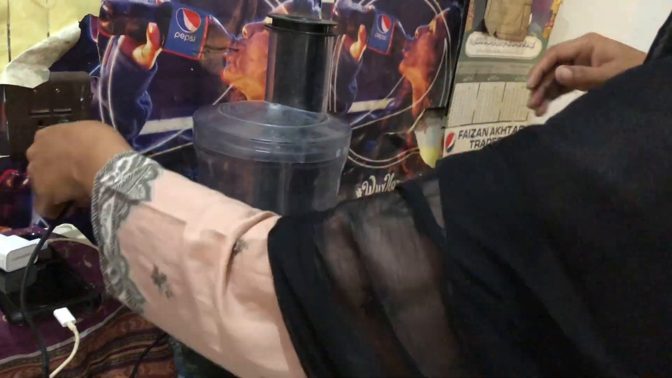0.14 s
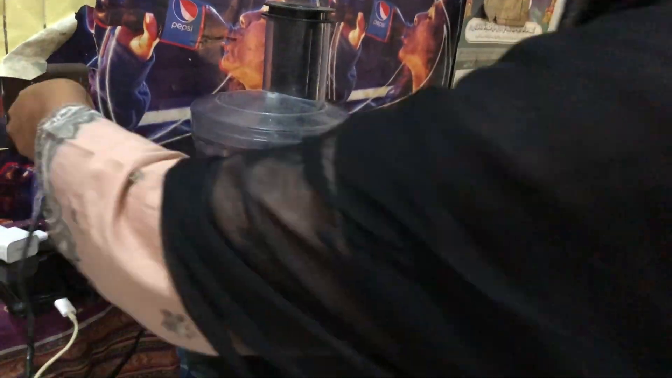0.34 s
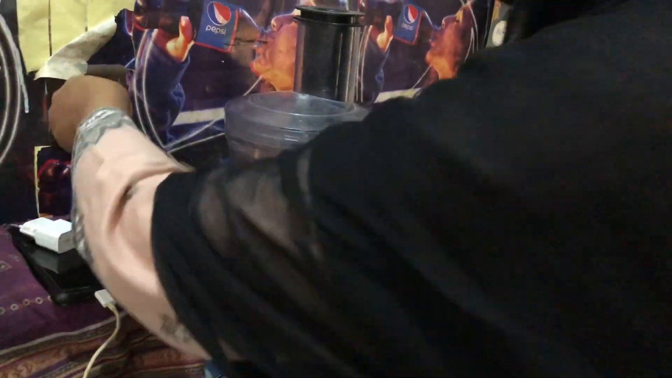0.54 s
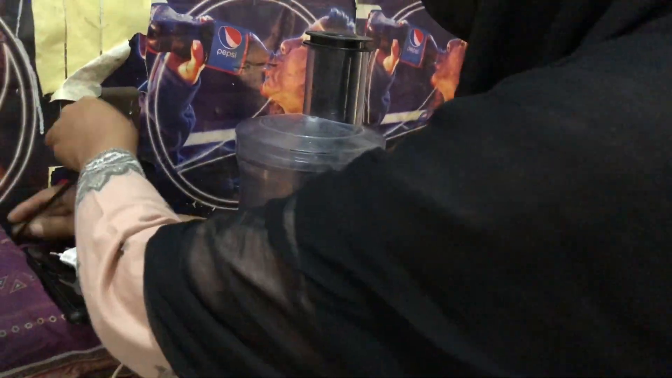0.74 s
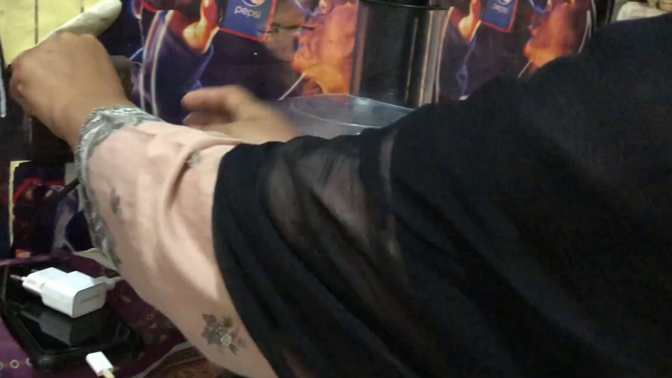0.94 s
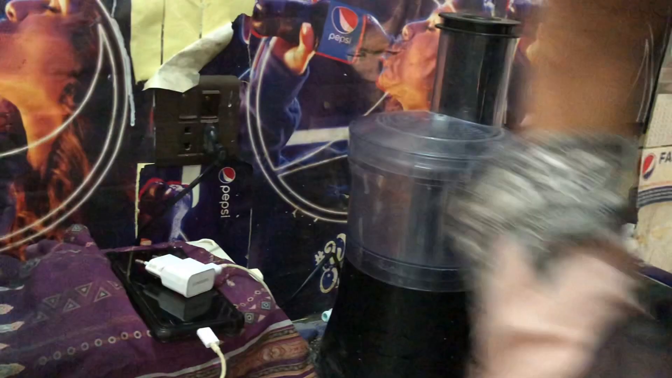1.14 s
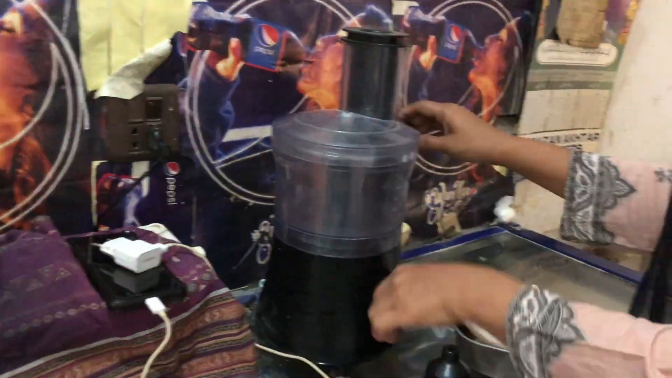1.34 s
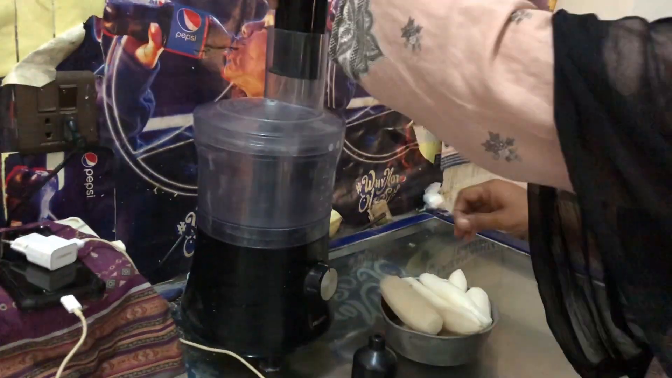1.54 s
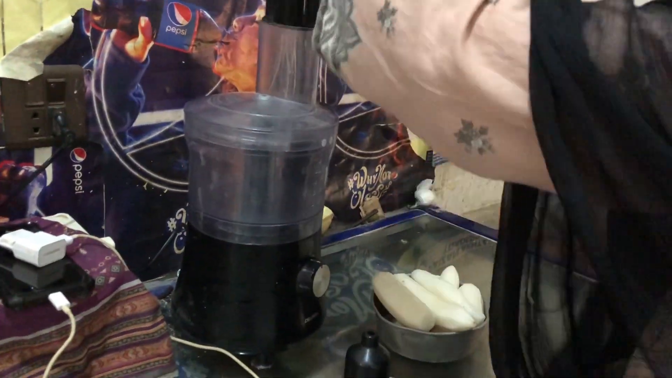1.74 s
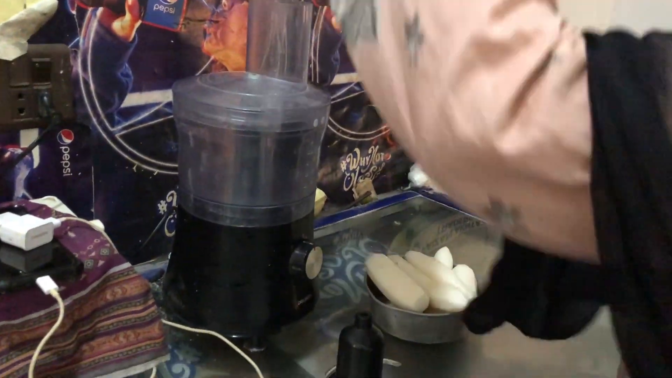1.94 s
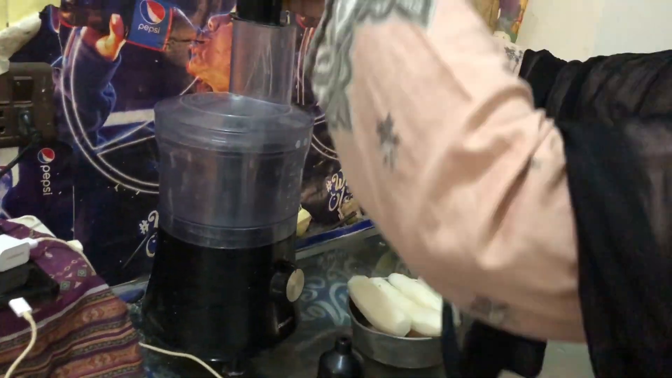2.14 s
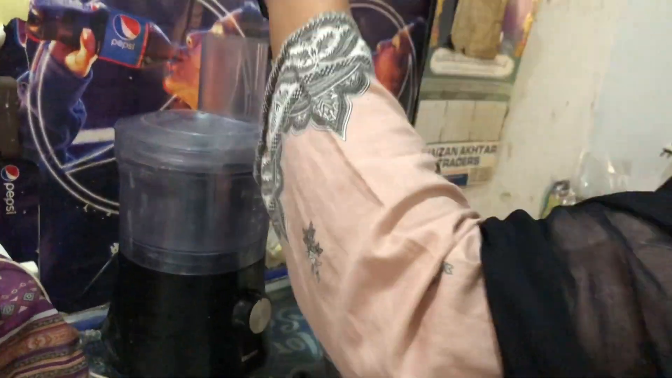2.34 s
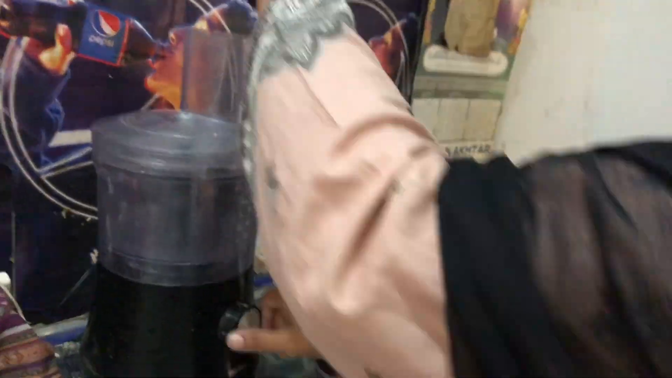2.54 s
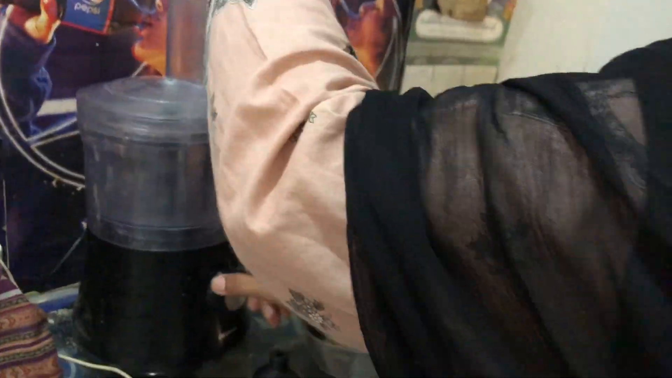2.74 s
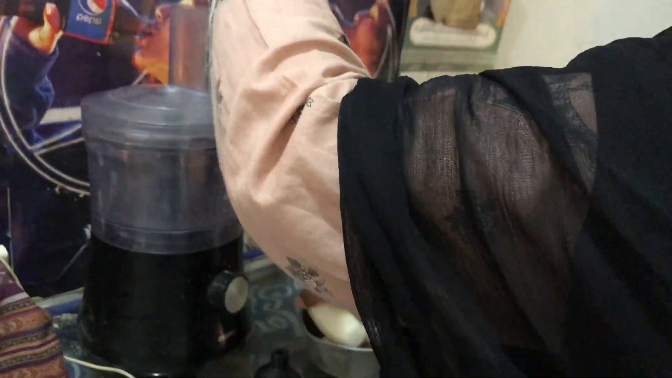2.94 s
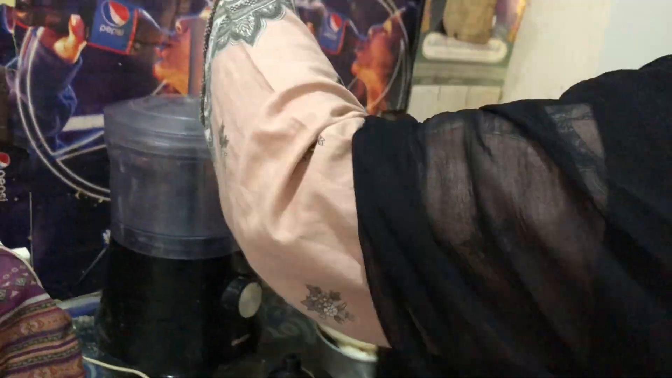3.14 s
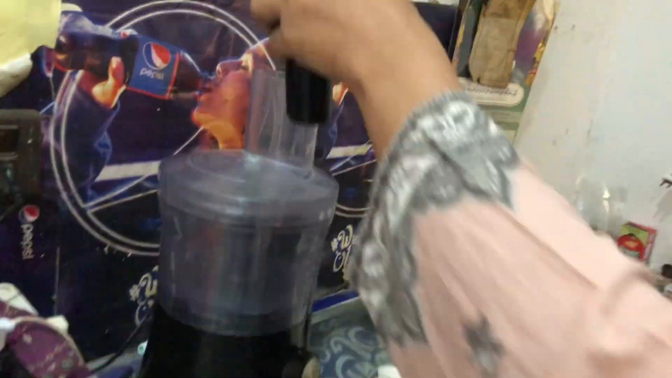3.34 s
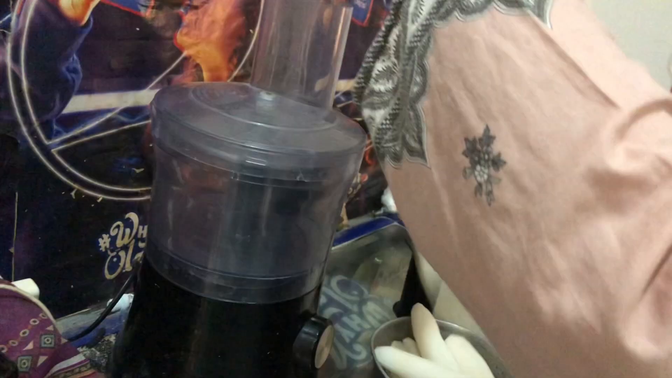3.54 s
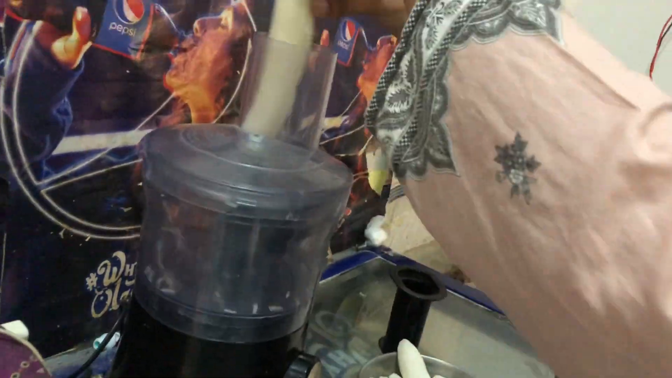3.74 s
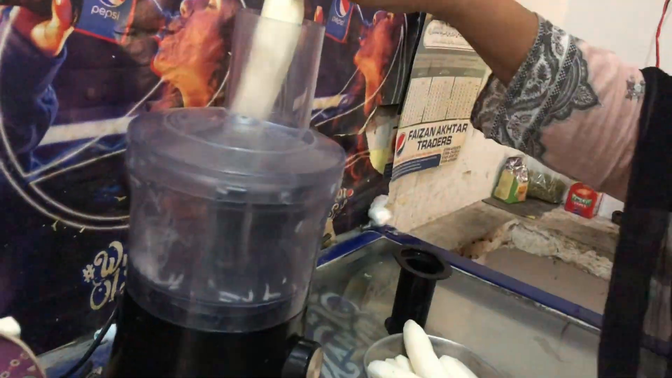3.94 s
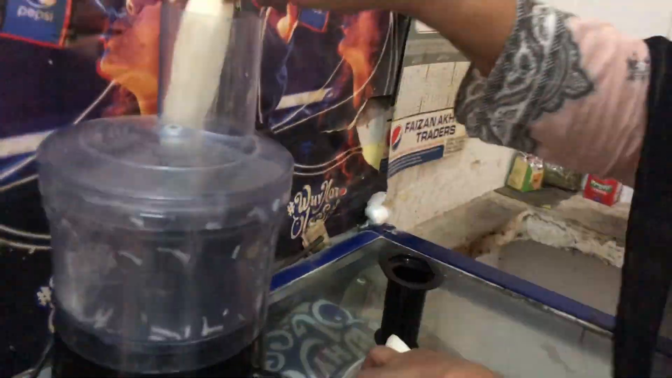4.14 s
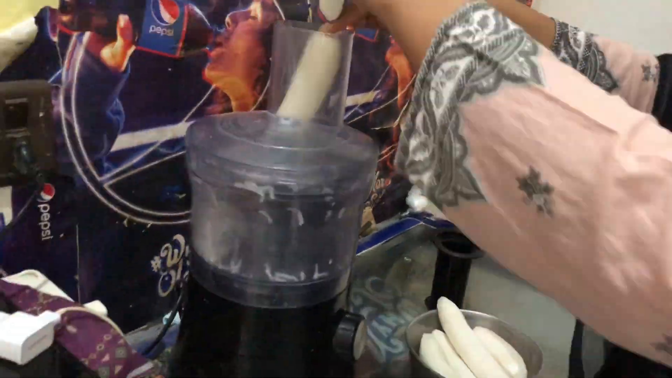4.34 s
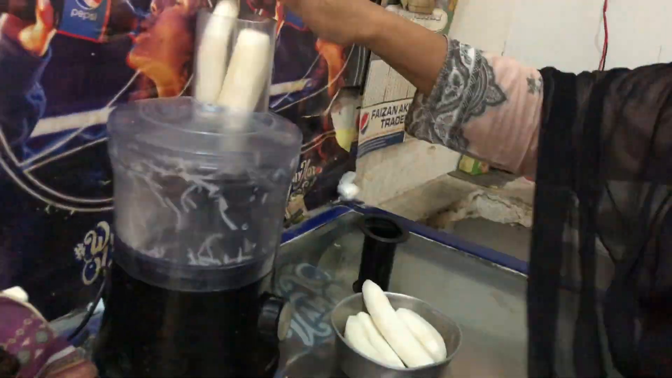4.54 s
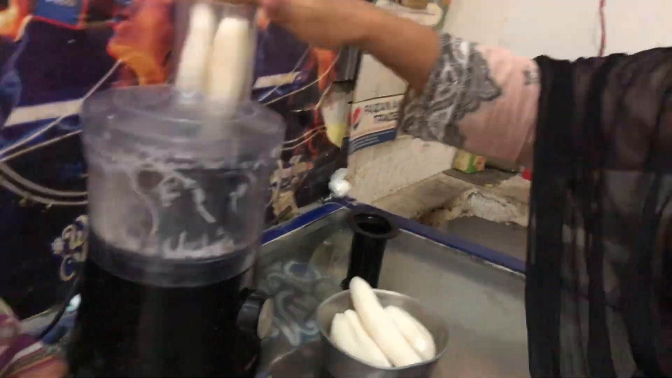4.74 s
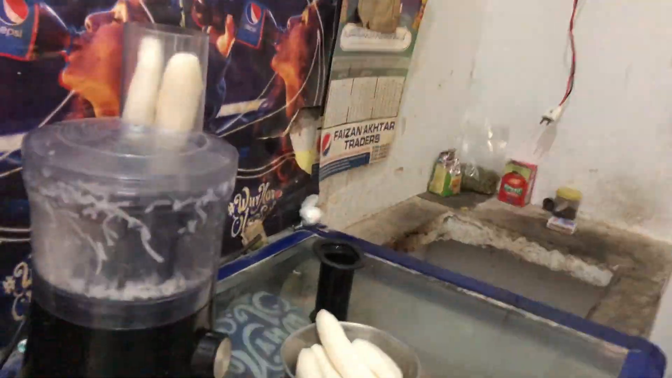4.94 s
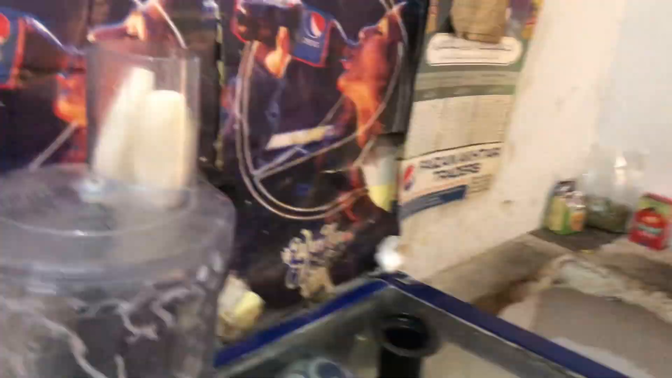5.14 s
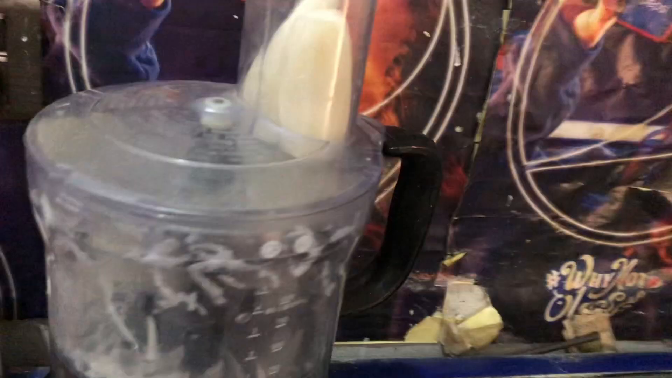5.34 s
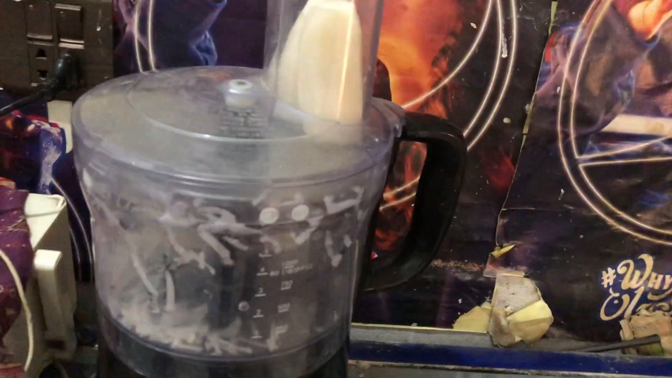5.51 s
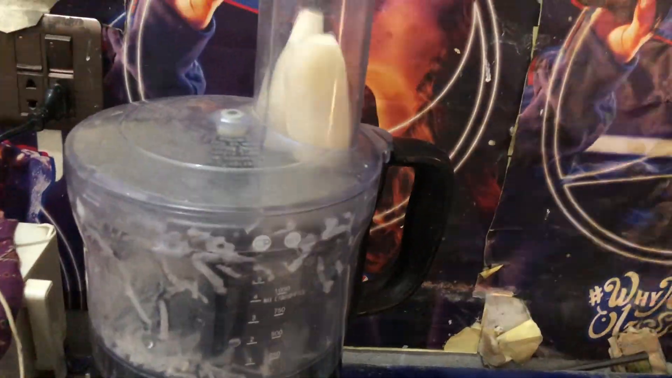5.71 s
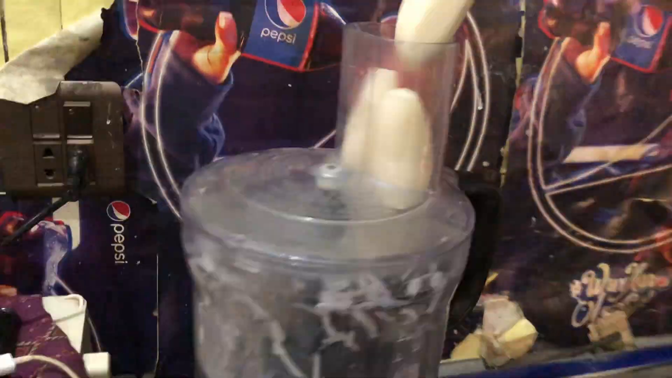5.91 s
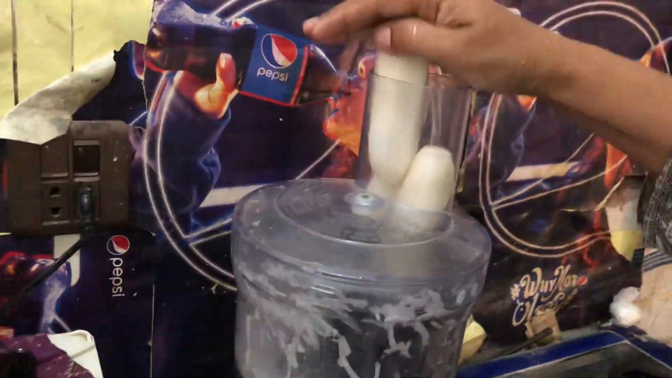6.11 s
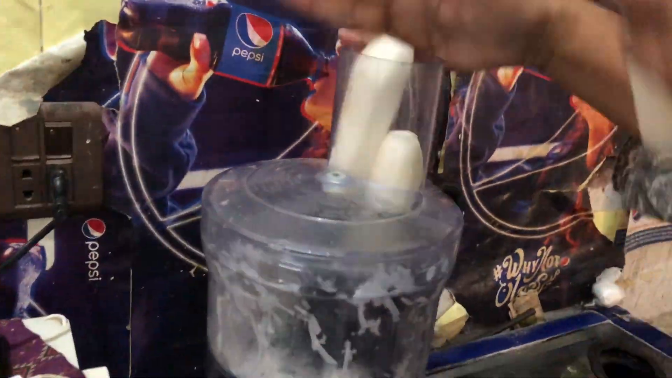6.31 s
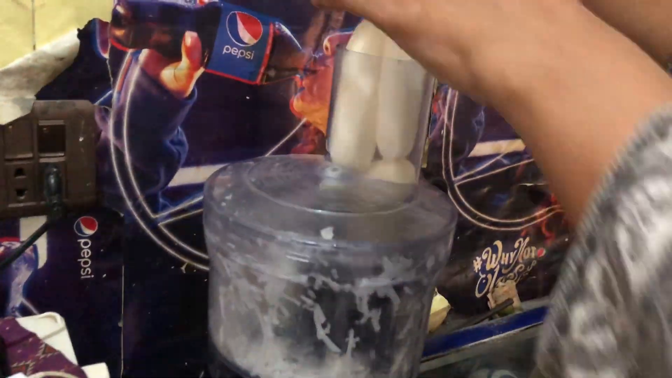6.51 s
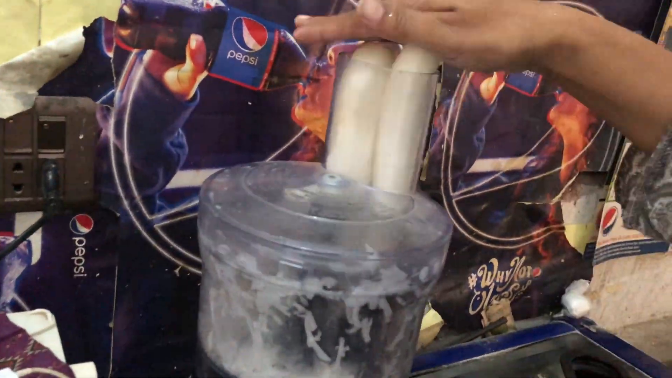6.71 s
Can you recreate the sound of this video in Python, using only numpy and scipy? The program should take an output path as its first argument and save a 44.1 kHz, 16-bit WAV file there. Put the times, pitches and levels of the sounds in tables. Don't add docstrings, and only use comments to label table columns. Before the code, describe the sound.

Over faint room hiss and fan hum, plastic slides softly from 0 s, with small ticks of a plug around 0.2-0.5 and sharper switch snaps at 0.54 and 0.8. At 1.1 the motor bursts into a rising whirr, cutting off and winding down by about 1.45. From 1.5 to 2.3 hard plastic lid and pusher are fitted: clicks, table thuds, a loud double clack near 1.78, catches and rattles. A bright latch crack lands at 2.43, then near quiet. At 2.9 the motor whines up quickly into a loud, hissy, brushy roar that lasts to the end. Roots drop with hollow thumps at 3.13 and 3.42, squeaking; a sharp bite and squeal come at 4.0. Irregular chunky knocks follow, dense until 4.5, sparser later, with renewed bites around 6.0-6.7. The bowl throbs and the whine wavers under load. Close, dry, bass-light sound.

```python
import sys
import numpy as np
from scipy import signal
from scipy.fft import rfft, irfft, next_fast_len
from scipy.io import wavfile

SR = 44100
rng = np.random.default_rng(int(sys.argv[2]) if len(sys.argv) > 2 else 0)


def rack_gain(trim_db):
    fader = np.asarray(trim_db, float)
    return 10 ** (fader / 20)


def transcribe(u):
    v = np.clip(np.atleast_2d(u).T, -1, 1)
    q = np.round(v * 32767).astype(np.int16)
    wavfile.write(sys.argv[1], SR, q)


N = 298557


def rms_one(x):
    return x / np.sqrt(np.mean(x ** 2) + 1e-20)


def in_time(tables, quiet=-120.):
    t = np.arange(N) / SR
    out = np.full((len(tables[0][0]) - 1, N), quiet)
    for rows in tables:
        s, *columns = np.transpose(rows)
        inside = (t >= s[0]) & (t <= s[-1])
        out[:, inside] = [np.interp(t[inside], s, c) for c in columns]
    return out


def drift(rate_hz):
    points = rng.standard_normal(1000)
    return np.interp(np.arange(N) / SR * rate_hz, np.arange(1000), points) * 0.8


def swell(start_s, rise_s, hold_s, level_db, fade_db_per_s):
    out, at = np.zeros(N + SR), round(start_s * SR)
    t = np.arange(SR) / SR
    fade_db = fade_db_per_s * np.maximum(t - rise_s - hold_s, 0)
    out[at:at + SR] = np.clip(t / max(rise_s, .001), 0, 1) * rack_gain(level_db - fade_db)
    return out[:N]


def band(x, low_hz, high_hz):
    return signal.sosfilt(signal.butter(3, [low_hz, high_hz], "band", fs=SR, output="sos"), x)


def resonate(x, hz, width):
    r = np.exp(-np.pi * width / SR)
    zeros = np.array([1, 0, -1]) * (1 - r * r) / 2
    return signal.lfilter(zeros, [1, -2 * r * np.cos(2 * np.pi * hz / SR), r * r], x)


def narrow(x, hz, width):
    return rms_one(resonate(resonate(x, hz, 3 * width), hz, width))


def colour(x, spectrum):
    hz, db = np.transpose(spectrum)
    size = next_fast_len(N)
    grid = np.maximum(np.arange(size // 2 + 1) * SR / size, 1)
    return irfft(rfft(x, size) * rack_gain(np.interp(np.log(grid), np.log(hz), db)), size)[:N]


def room(x):
    t60_s, level_db = 0.13, -8.5
    t = np.arange(int(.4 * SR)) / SR
    tail = band(rng.standard_normal(len(t)), 230, 12800) * rack_gain(-60 * t / t60_s) * (t > .004)
    return rack_gain(level_db) * signal.fftconvolve(x, tail / np.linalg.norm(tail))[:N]


# frequency in Hz, level in dB.
ROOM_HISS = [(47, -63), (80, -47), (417, -5), (582, -17), (795, -3), (889, -11), (994, -6.5), (1810, -8),
             (2270, -13.5), (2900, -6), (3620, -10.5), (12100, -22.5), (15700, -20)]
# frequency in Hz, width in Hz, level in dB.
FAN_HUMS = [(153, 330, -65.5), (505.5, 17, -58.5), (1770, 24, -55), (1520, 530, -50), (5316, 6.9, -68),
            (6960, 10, -70), (9030, 10, -72)]


def background():
    air = rng.standard_normal((2, N))
    hiss = rack_gain(-50 + 2.0 * drift(7.87)) * rms_one(colour(air[0], ROOM_HISS))
    hums = sum(rack_gain(db + 1.3 * drift(9)) * narrow(air[1], hz, width) for hz, width, db in FAN_HUMS)
    return hiss + hums


# frequency in Hz, width in Hz, level in dB.
TABLE_MODES = [(205, 5.8, -7), (266, 18, -9), (327, 20, -10), (393, 18, -2), (454, 22, -2), (507, 20, 4),
               (653, 39, -3.5), (827, 11, -6)]
# start in seconds, hold in seconds, level in dB, lowest mode in dB.
THUDS = [
    (1.016, 0.011, -34, -1),
    (1.114, 0.19, -47, -33),
    (1.488, .01, -38, -13),
    (1.602, 0.054, -24, -0.5),
    (1.85, 0.041, -24.5, 4),
    (2.614, 0.019, -40, 12),
    (3.128, 0.019, -26, -20),
    (3.4, 0.026, -24, -8),
    (3.56, 0.28, -41, 11),
    (3.694, .02, -28.5, -24),
]


def table():
    rise_s, fade_db_per_s = 0.019, 146
    shove = rng.standard_normal(N)
    lowest, *others = [rack_gain(db) * narrow(shove, hz, width) for hz, width, db in TABLE_MODES]
    rings, out = sum(others), np.zeros(N)
    for s, hold, level_db, low_db in THUDS:
        out += swell(s, rise_s, hold, level_db, fade_db_per_s) * rings
        out += swell(s, rise_s, hold, level_db + low_db, 0.66 * fade_db_per_s) * lowest
    return rack_gain(-15.0) * out


# frequency in Hz, level in dB, t60 in seconds.
BODY_MODES = [(694, -7, .1), (820, -2, .055), (930, -3, .045), (1010, -1, .045), (1120, -1, .055),
              (1314, -3, .04), (1460, -5, .045), (1970, -4, .03), (2290, -4, .025), (2800, -7, .018)]
# frequency in Hz, level in dB, t60 in seconds.
SNAP_MODES = [(3730, -10, .03), (4550, 0, .025), (4850, 1, .025), (5280, 1, .03), (5650, 0, .02),
              (6150, -3, .02)]
# start in seconds, swell in seconds, hold in seconds, level in dB.
SLIDES = [
    (0.0, 0.79, .1, -36),
    (.44, .06, 0.09, -37),
    (0.674, 0.004, 0.02, -33),
    (0.7, .09, 0.03, -31),
    (1.48, .1, .01, -43),
    (1.75, .1, .2, -42),
    (2.33, 0.077, .01, -34),
]


def slides():
    grains = rng.standard_normal(N) * rack_gain(4.5 * drift(150))
    ringing = sum(rack_gain(level_db) * resonate(grains, hz, 150) for hz, level_db, _ in SNAP_MODES)
    rubbing = rms_one(band(grains, 1500, 15600) + 0.8 * ringing)
    strokes = sum(swell(*row, 101) for row in SLIDES)
    return rack_gain(-18.5) * strokes * rubbing


# start in seconds, length in seconds, start Hz, end Hz, level in dB.
RUBS = [
    (.1, .056, 800, 795, -51),
    (.218, .1, 1520, 1330, -38.5),
    (.96, .035, 3600, 3540, -49),
    (1.93, .19, 4200, 3970, -47),
    (2.07, .07, 3680, 3600, -50),
]
# start in seconds, length
# in seconds, start Hz, end Hz, level in dB.
SQUEAKS = [(3.28, .05, 1980, 2420, -21), (3.325, .09, 2400, 2350, -26.5), (3.31, .11, 1170, 1140, -25),
           (4.0, .055, 2480, 2590, -16), (4.095, .027, 2050, 2040, -26), (4.0, .07, 1150, 1300, -26),
           (4.07, .06, 1290, 1100, -28), (3.19, .06, 2960, 3000, -31), (3.265, .05, 2950, 3170, -29),
           (3.47, .05, 2280, 2450, -28), (3.48, .05, 3600, 3900, -32), (4.826, .018, 3250, 3300, -29),
           (6.206, .05, 4260, 4306, -33), (5.24, .16, 4200, 4280, -36)]


def squeaks():
    out = np.zeros(N)
    for rows, breadth in [(RUBS, .16), (SQUEAKS, 0.026)]:
        for s, length, start_hz, end_hz, level_db in rows:
            at, size = round(s * SR), round(length * SR)
            steps = np.arange(size) / SR * breadth * start_hz
            slow = [np.interp(steps, np.arange(200), row) for row in rng.standard_normal((2, 200))]
            glide_hz = start_hz + (end_hz - start_hz) * np.sin(np.linspace(0, np.pi / 2, size))
            phase = 2 * np.pi * np.cumsum(glide_hz) / SR
            tone = rms_one(slow[0] * np.cos(phase) + slow[1] * np.sin(phase))
            out[at:at + size] += rack_gain(level_db) * tone * signal.windows.tukey(size, .5)
    return out


# frequency in Hz, level in dB, t60 in seconds.
LATCH_MODES = [(694, -9, 0.33), (790, -9, 0.11), (1040, -3, 0.022), (1116, -9, 0.073), (1490, -10, 0.08),
               (1780, -10, 0.073), (1980, -2, 0.061), (2880, 8, 0.019), (3009, -12, 0.18), (3110, 4, .07),
               (3770, -4, 0.043), (4390, 7, 0.048), (5100, 4, 0.029), (5870, -21.5, .08)]


def latch():
    start_s, rebound_s, rebound_db, level_db = 2.4338, 0.0024, -1, -4.5
    burst, at = np.zeros(N) + 1e-18, round(start_s * SR)
    burst[at:at + 200] = 0.041 * rng.standard_normal(200) * np.exp(-np.arange(200) / 60.)
    burst[[at, at + round(rebound_s * SR)]] += [1, rack_gain(rebound_db)]
    rings = np.zeros(N)
    for k, (hz, mode_db, t60) in enumerate(LATCH_MODES):
        rings += (-1) ** k * rack_gain(mode_db) * resonate(burst, hz, 2.8 / t60) * t60
    return rack_gain(level_db) * rings / np.max(np.abs(rings))


# start in seconds, hollow body in dB, tick over body in dB, t60 in seconds.
PLUG = [(0.0014, -39.5, 7.5, 0.15), (0.2214, -35, -9, 0.1), (0.2557, -42, -6, 0.088),
        (0.295, -46, -20, 0.14), (0.492, -26, -9, 0.19), (0.505, -29, -5, 0.079), (0.5153, -36, 6, .1),
        (0.5624, -39, 4, 0.11), (0.608, -41, 6, .1), (0.6754, -29, 14, 0.056), (0.7256, -35, 7, 0.098),
        (0.738, -39, 8, .1), (0.7574, -36.5, 18, 0.1), (0.7925, -31, 11, 0.12), (0.799, -22, 3, 0.15),
        (1.0395, -40, 7, .09), (1.1081, -35, 22, 0.081)]
ROCKER = [
    (0.5417, -14, 3.5, 0.072),
    (0.67, -26, 10, 0.12),
    (0.803, -25, 5, 0.14),
    (0.733, -34, -5, .08),
]
LID = [(1.51, -23.5, 10.5, 0.15), (1.5844, -31, -9, 0.087), (1.6207, -33.5, -1, 0.16),
       (1.6446, -29, 4.5, 0.16), (1.7753, -9.5, -1, 0.12), (1.7844, -9.5, -4, 0.058),
       (1.82, -21.5, -11, 0.36), (2.067, -53, 24, .12), (2.0765, -54, 28, 0.15), (2.1466, -24, 2, .07),
       (2.177, -17, -14, 0.14), (2.1866, -18.5, 1, 0.12), (2.1994, -15.5, -8, 0.12),
       (2.2195, -24, -23, 0.071), (2.434, -9, -2.5, 0.047), (2.6894, -42, -23, .09), (2.8579, -62, 25, .06),
       (2.8937, -16.5, -3, 0.2)]
CATCHES = [
    (1.6945, -27, 1, 0.081),
    (1.838, -23.5, 4, 0.077),
    (1.8988, -16.5, 1.5, 0.088),
]
THIN_CATCHES = [
    (0.4549, -42, 20, 0.077),
    (0.5288, -37, 17, 0.057),
    (1.5427, -19, 7, 0.061),
    (1.8104, -13.5, -7, 0.061),
    (2.1384, -13, -2, 0.11),
    (2.2522, -23, -8, 0.089),
    (2.2809, -23, 1, 0.11),
]
ROOTS = [
    (3.129, -5.5, -20, 0.15),
    (3.1503, -6.5, -7, 0.091),
    (3.4155, -3, -12, 0.094),
    (3.4444, -10.5, -10, 0.088),
    (4.0086, -6.5, 11.5, 0.027),
]
CHUNKS = [(3.708, -20, -23, 0.05), (3.764, -17, -25, 0.05), (3.801, -7, -25, 0.05), (3.849, -9, -25, 0.05),
          (3.939, -14, -29, 0.05), (4.008, -5, -25, 0.04), (4.099, -15, -27, 0.05), (4.13, -12, -27, 0.057),
          (4.188, -5, -30, 0.061), (4.237, -11, -25, 0.05), (4.303, -8, -25, 0.05), (4.342, -23, -23, 0.05),
          (4.405, -8, -22, 0.05), (4.525, -11, -25, 0.05), (4.759, -9, -25, 0.05), (4.975, -12, -25, 0.05),
          (5.143, -6.5, -25, 0.05), (5.275, -11, -25, 0.046), (5.486, -14, -25, 0.044),
          (5.96, -14, -25, 0.05), (5.98, -7, -25, 0.05), (6.099, -7, -29, 0.05), (6.162, -6.5, -28, 0.05),
          (6.288, -14, -22, 0.05), (6.378, -6, -25, 0.063), (6.716, -4, -25, 0.05)]
EDGES = [
    (3.13, -9, -23, 0.11),
    (3.152, -10, -20, .08),
    (3.8, -11, -20, .06),
    (2.3, -18, -20, .04),
]
# knocks, body centre in Hz, snap centre in Hz, snap over body in dB,
# share of the tick's brightness in the snap.
STRUCK = [
    (PLUG, 1270, 5500, -1.5, 0.42),
    (LID, 890, 5800, -1.5, 0.68),
    (ROOTS, 810, 5000, -25, .3),
    (CATCHES, 1150, 4800, 4.2, 0.95),
    (THIN_CATCHES, 970, 5350, 3.4, 0.77),
    (ROCKER, 2600, 8500, -11, 0.28),
]
ON_DISC = [
    (CHUNKS, 810, 5000, -30, .3),
    (EDGES, 2900, 4000, -20, .3),
]


def knocks(struck):
    size = 6144
    out, t = np.zeros(N + size), np.arange(size) / SR
    every_knock = [(*row, *kind) for rows, *kind in struck for row in rows]
    for s, body_db, bright_db, t60, centre_hz, snap_hz, snap_db, share in every_knock:
        t60 = np.clip(t60, .02, .3)
        soft = 1 / (1 + (.15 / t60) ** 6)
        contact = rack_gain(-60 * t / t60) * (1 - soft * np.exp(-t / 0.014))
        contact = contact + (1 - soft) * 0.36 * np.exp(-t / 0.00071)
        rattle = rng.standard_normal((3, size)) * contact
        rattle[2, :40] *= 1 + 1.2 * (1 - soft)
        body = 0.16 * band(rattle[0], 755, 2220)
        snap = 0.046 * band(rattle[1], 3300, 4900)
        hiss = band(rattle[2] * rack_gain(-25 * t / t60), 6200, 14800)
        parts = [body, snap, hiss]
        # modes, centre in Hz, loss in dB per octave off centre, widening
        kinds = [(BODY_MODES, centre_hz, 20.0, 1), (SNAP_MODES, snap_hz, 60.0, 1.9)]
        for k, (modes, middle_hz, loss_db, wider) in enumerate(kinds):
            dying = rattle[k] * rack_gain(-120 * t / t60)
            for hz, level_db, ring_s in modes:
                strength_db = rng.normal(0, 1.2) - loss_db * np.abs(np.log2(hz / middle_hz))
                width = 2.2 / ring_s * wider
                ring = np.sqrt(400 / width) * resonate(dying, hz, width)
                parts[k] = parts[k] + rack_gain(level_db + strength_db) * ring
        at = round(s * SR)
        for part, level_db in zip(parts, [3.5, snap_db + share * bright_db + 2.0, bright_db]):
            out[at:at + size] += rack_gain(body_db + level_db) * part / np.max(np.abs(part))
    return out[:N]


# time in seconds, commutator frequency in Hz, whine in dB.
SPEED = [
    [(1.107, 1250, -44), (1.155, 2207, -32), (1.2, 2760, -36), (1.24, 3030, -28), (1.3, 3140, -40),
     (1.35, 2780, -46), (1.388, 1990, -33), (1.44, 1000, -42), (1.48, 600, -65)],
    [(2.889, 1900, -38), (2.95, 2600, -31), (3.0, 2960, -31), (3.07, 3240, -37), (3.17, 3385, -43),
     (3.75, 3575, -35), (3.9, 3505, -38), (4.36, 3475, -38), (4.47, 3630, -29), (4.63, 3655, -30),
     (4.77, 3550, -33), (5.02, 3735, -33), (5.56, 3842, -35.5), (6.0, 3850, -35.5), (6.22, 3500, -40),
     (6.45, 3720, -34), (6.57, 3710, -34), (6.77, 3350, -42)],
]
# multiple of the turn rate, level in dB.
ROTOR_TONES = [(11, 1), (22, 0), (23, 2.5), (24, -8), (44, -6)]


def rotor():
    segments, full_speed_hz = 22, 3850
    whine_hz, whine_db = in_time(SPEED)
    whine_hz = np.maximum(whine_hz, 0)
    speed = whine_hz / full_speed_hz
    turns = np.cumsum(whine_hz / segments) / SR + .0038 * drift(50)
    tones = rack_gain(-11) * speed ** 12 * np.sin(4 * np.pi * turns)
    for k, level_db in ROTOR_TONES:
        growth = 1 if k % segments == 0 else speed ** 26
        tones = tones + rack_gain(level_db + 2 * drift(14)) * growth * np.sin(2 * np.pi * k * turns)
    return turns, rack_gain(whine_db) * tones


# frequency in Hz, level in dB.
ROAR = [(90, -70), (170, -63), (330, -10.5), (420, 8.5), (600, -10), (800, -16), (1200, -5), (1600, -6),
        (2300, -5.5), (3300, -5), (5500, -10), (9400, -2), (13000, 9.5), (15800, 0)]
# frequency in Hz, width in Hz.
HOLLOWS = [(198, 12), (405, 45), (501, 13), (635, 14), (694, 16), (821, 40), (889, 36), (995, 50),
           (1103, 45), (1338, 30), (1450, 34), (1785, 100), (1934, 36), (2303, 75), (2532, 24), (3010, 45),
           (3727, 30), (4017, 24)]
HOLLOWS_DB = [-45, -14, 12, 5, 0, 0.5, 2, -0.5, -4, -3.5, -5, -2, -8, -1.5, -10, -15, -6.5, -9.5]
HOLLOWS_LOOSE = [-.5, -.5, 1, -1.4, 0.19, -.6, -0.52, 0.17, 0.27, 0.18, -0.22, -0.047, 0.62, 0.16, -0.57, 1,
                 0, 0.095]
HOLLOWS_LOAD = [.1, .1, 0.98, 0.62, 0.12, 0.13, .1, 0.069, .1, .1, .1, 0.062, .1, 0.078, .1, .1, .1, .1]
HOLLOWS_LEAN = [.1, .1, -1.3, .1, 0.21, 0.49, 0.035, -0.18, 0.26, 0.23, 0.44, .6, 0.34, -0.26, 0.17, -.3,
                -0.62, .1]
# frequency in Hz, width in Hz, level in dB.
HOUSING = [(4320, 110, -11), (5200, 65, -6), (5680, 620, -4.5), (6250, 140, -1.5), (7060, 640, -0.5),
           (7370, 290, 0.5), (13420, 450, -1.5), (8044, 190, 3.5), (10830, 250, 2), (12370, 700, 2),
           (14170, 800, 0)]
HOUSING_LOAD = [0.37, .1, 0.013, .1, .4, 0.59, 0.097, 0.054, -0.54, -0.13, 0.3]
HOUSING_LEAN = [-0.22, -0.93, -1.5, -0.017, -0.11, -0.2, .4, 0.21, 0.46, -.3, 0.96]
# time in seconds, nearness in dB.
LEAN = [(1.1, -0.5), (1.5, 5.5), (2.88, -2), (3.5, 0.5), (4.1, -1), (4.6, -0.6), (5.05, 0.8), (5.35, 5.5),
        (5.7, 3.5), (5.98, 6.5), (6.12, -1), (6.45, 2.7), (6.77, 1)]
# frequency in Hz, width in Hz, depth from 0 to 1.
DIPS = [
    (3265, 400, 0.58),
    (9130, 1440, 0.18),
    (548, 41, 0),
]


def housing(turns, tones, load_db, loose_db):
    t = np.arange(N) / SR
    sparks = rng.standard_normal((2, N)) * (1 + 0.043 * np.cos(2 * np.pi * turns))
    roar, whine = rack_gain(-4.0) * colour(sparks[0], ROAR), 1.13 * tones
    (lean_db,) = in_time([LEAN], quiet=0.)
    strain_db = np.where(t > 2, load_db, 0)
    hollows = [(*hollow, db + share * loose_db)
               for hollow, db, share in zip(HOLLOWS, HOLLOWS_DB, HOLLOWS_LOOSE)]
    shares = zip(HOLLOWS_LOAD + HOUSING_LOAD, HOLLOWS_LEAN + HOUSING_LEAN)
    for (hz, width, level_db), (loaded, leaned) in zip(hollows + HOUSING, shares):
        ring, sympathy = resonate(np.array([sparks[1], tones]), hz, width)
        uneven_db = .8 * drift(2.5) + 1.8 * drift(25)
        roar += rack_gain(level_db + uneven_db + loaded * strain_db + leaned * lean_db) * ring
        whine += 0.45 * sympathy
    roar = roar + rack_gain(-13) * rms_one(room(band(roar, 4500, 15000))) * np.std(roar)
    lower = band(roar, 350, 4500)
    roar = roar + rack_gain(-7) * rms_one(room(lower)) * np.std(lower)
    for hz, width, depth in DIPS:
        roar = roar - depth * resonate(roar, hz, width)
    return roar, whine


# switched on in seconds, switched off in seconds, roar in dB, loose lid's rattle in dB.
RUNS = [
    (1.107, 1.36, -11.5, 8),
    (2.889, 7.0, -10.5, 0),
]
# time in seconds, load in dB.
LOAD = [
    [(1.1, -10.5), (1.2, -10), (1.35, -12.5), (1.5, 8)],
    [(2.88, -1.5), (3.0, -5.5), (3.4, -3.5), (3.68, -4), (3.72, 0), (4.0, 1), (4.3, 0.5), (4.65, -0.5),
     (5.2, -1), (5.95, -0.5), (6.1, 0), (6.4, 1), (6.77, 2.5)],
]
# start in seconds, level in dB, length in seconds.
JOLTS = [
    (1.116, -23.5, 0.0067),
    (2.903, -20, 0.013),
    (3.118, -18, 0.019),
    (3.404, -26, 0.017),
    (3.823, -31, 0.0094),
    (3.983, -25, 0.036),
    (4.175, -32, 0.058),
    (4.561, -22.5, 0.041),
    (6.094, -23.5, 0.03),
    (6.55, -32, 0.032),
]
# level against the run in dB, dB per dB of load, jolt in dB,
# share of the loose lid's dB.
LAYERS = [
    (-2, -0.36, -35, -0.42),
    (-4, 0.14, -30, 0.37),
    (-10.5, 0.5, -9, 0.71),
    (-11.5, 1.24, -6, 0.46),
    (-26.5, 1.2, -21, 0.5),
]


def motor():
    rise_s, coast_db_per_s = 0.024, 209
    t = np.arange(N) / SR
    (load_db,) = in_time(LOAD)
    load_db = np.maximum(load_db, -40)
    power, loose_db = np.zeros(N), np.zeros(N)
    for on_s, off_s, level_db, rattle_db in RUNS:
        start = 1 - np.exp(-np.maximum(t - on_s, 0) / rise_s)
        power = power + start * rack_gain(level_db - coast_db_per_s * np.maximum(t - off_s, 0))
        loose_db = np.where(t > on_s, rattle_db, loose_db)
    jolts = sum(swell(s, 0.0034, length, level_db, 266) for s, level_db, length in JOLTS)
    turns, tones = rotor()
    roar, out = housing(turns, tones, load_db, loose_db)
    teeth = 1 + 0.24 * np.cos(np.pi * turns)
    # low Hz, high Hz, its wavering
    layers = [(10260, 16800, rack_gain(1.7 * drift(8))),
              (5270, 9940, rack_gain(0.67 * drift(7))),
              (1380, 5310, rack_gain(1.4 * drift(40) + 0.38 * drift(9.9))),
              (726, 1210, teeth * rack_gain(1.22 * drift(60) + 0.35 * drift(16))),
              (118.5, 770, rack_gain(2.3 * drift(7)))]
    for (low, high, beat), (level_db, share, jolt_db, rattle) in zip(layers, LAYERS):
        part = band(roar, low, high) * beat
        gain = power * rack_gain(level_db + share * load_db + rattle * loose_db) + jolts * rack_gain(jolt_db)
        out = out + gain * part / np.std(part[3 * SR + 1:])
    return out


def scene():
    hits = band(knocks(STRUCK) + latch(), 706, 21500)
    hits = hits + rack_gain(-5.5) * band(knocks(ON_DISC), 500, 12000)
    mono = background() + table() + slides() + squeaks() + hits + room(hits) + motor()
    return np.array([mono, mono])


def low_pass(x):
    return signal.sosfilt(signal.butter(12, 16880, fs=SR, output="sos"), x)


def record(dry):
    thin = signal.sosfilt(signal.butter(2, 170, "high", fs=SR, output="sos"), dry)
    limited = thin / (1 + np.abs(thin / 1.44) ** 4.3) ** (1 / 2.8)
    cut = signal.sosfilt(signal.ellip(12, .5, 60, 15720, fs=SR, output="sos"), limited)
    finished = np.clip(cut, -1, 1)
    return low_pass(finished)


dry = scene()
out = record(dry)
transcribe(out)
```